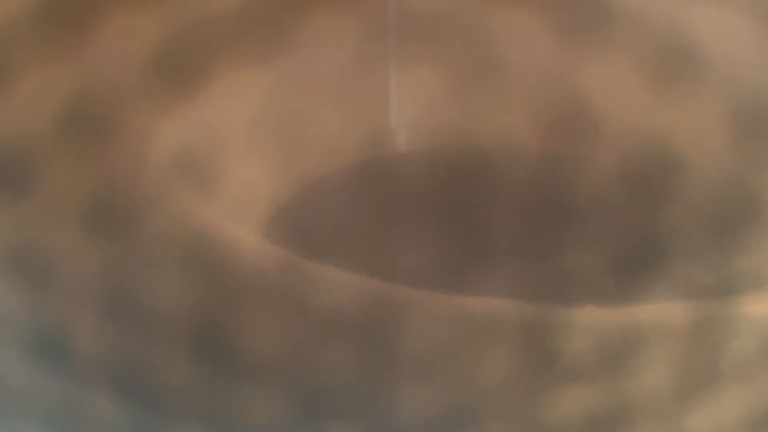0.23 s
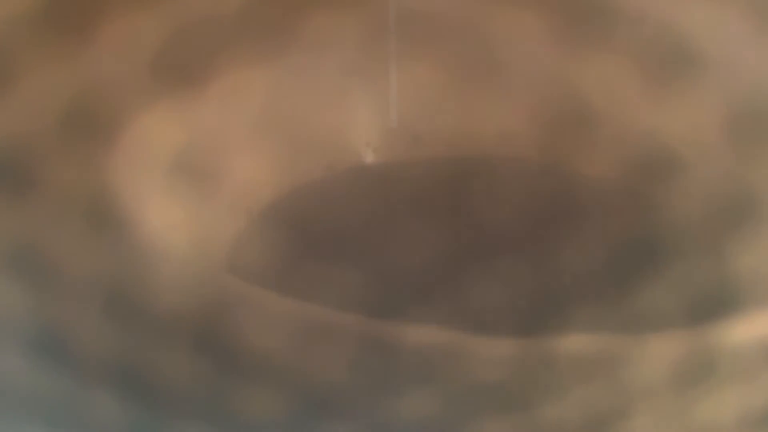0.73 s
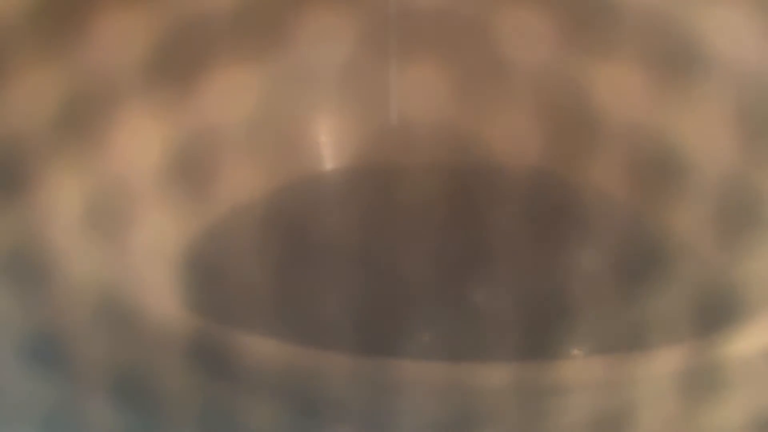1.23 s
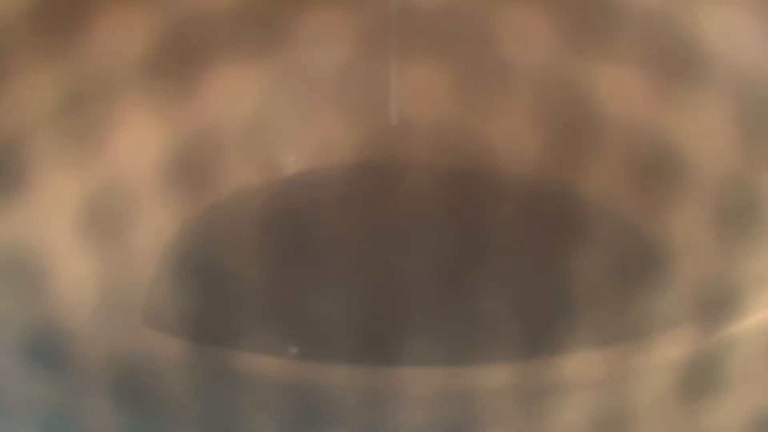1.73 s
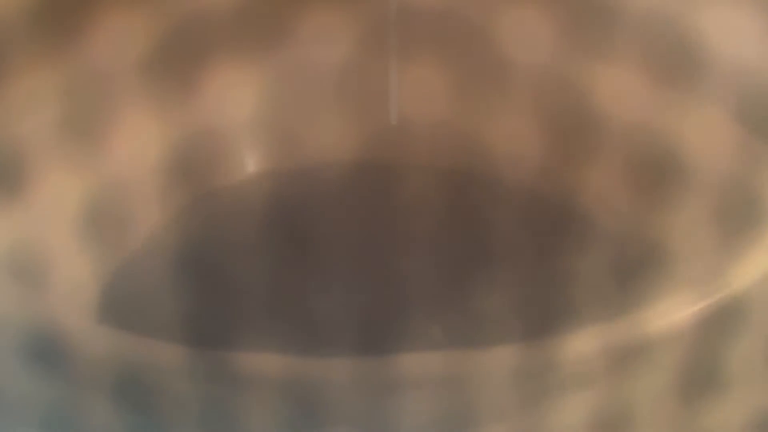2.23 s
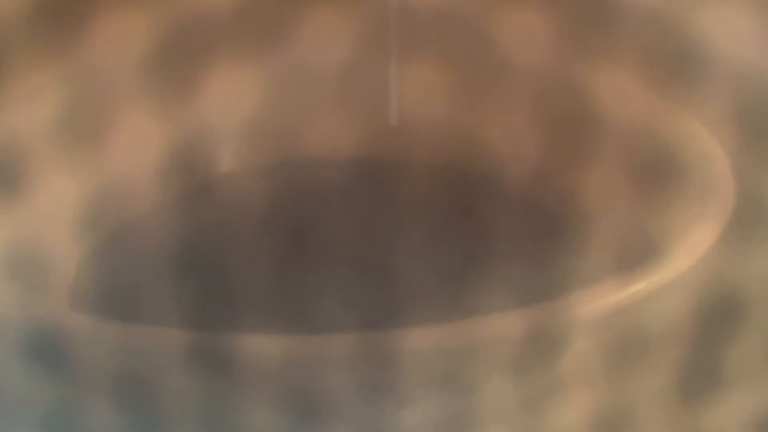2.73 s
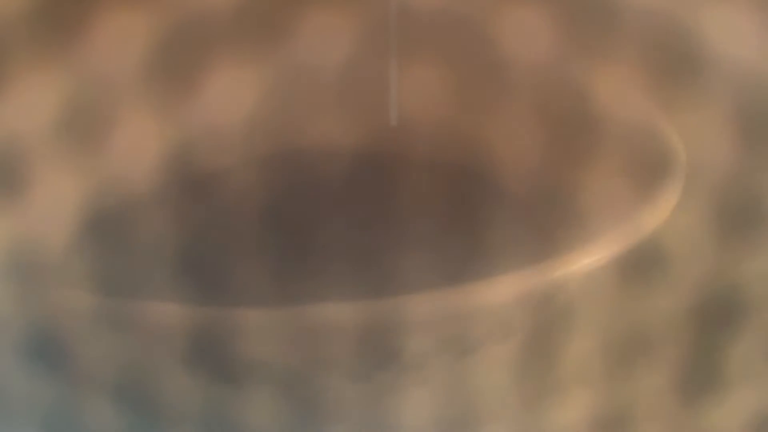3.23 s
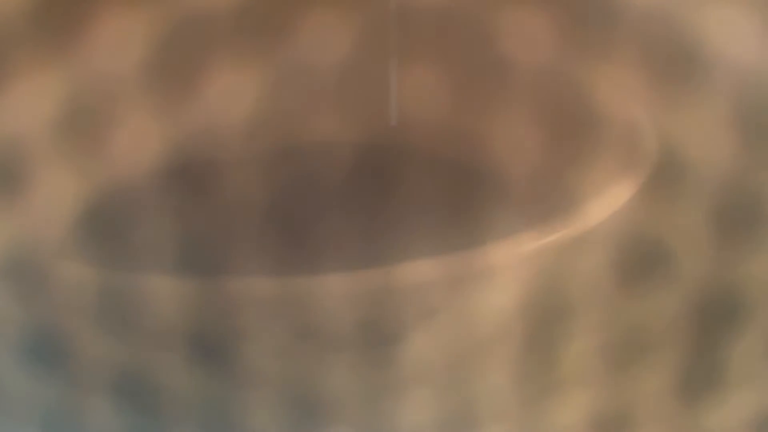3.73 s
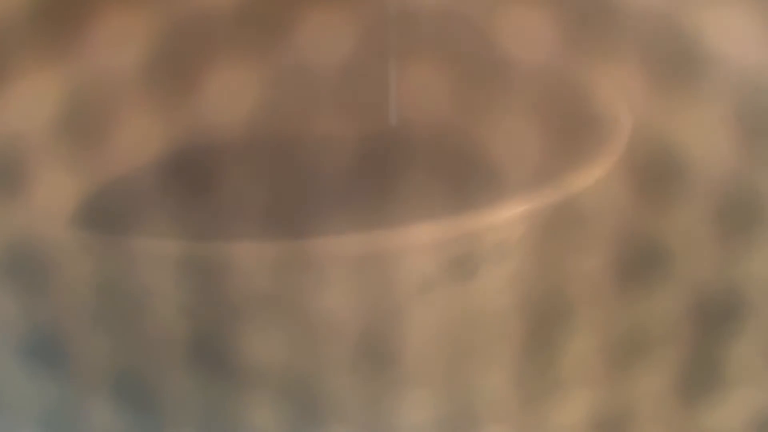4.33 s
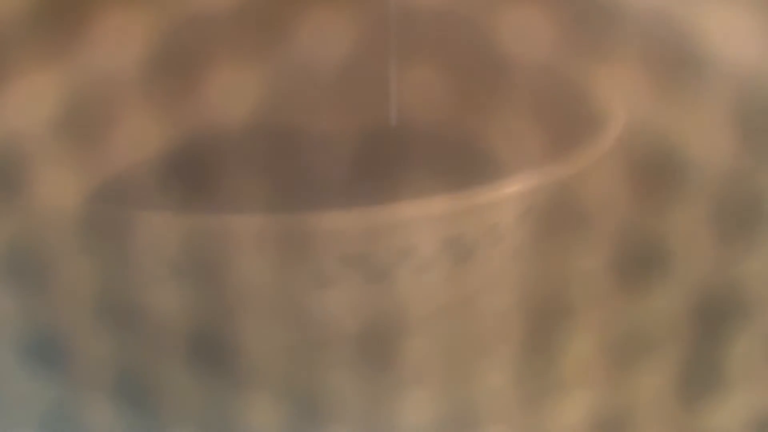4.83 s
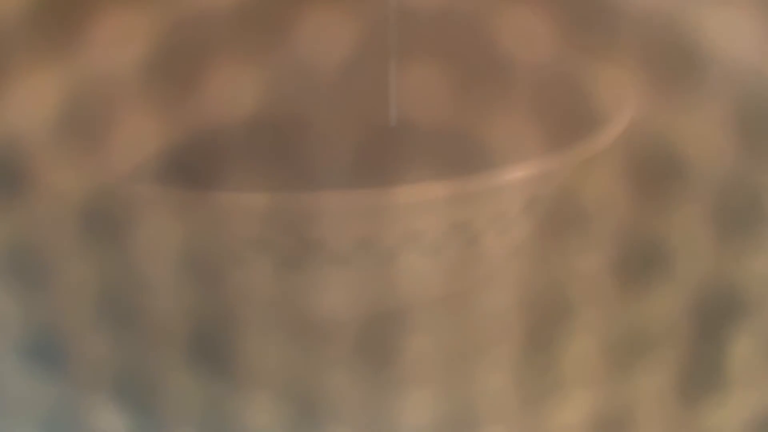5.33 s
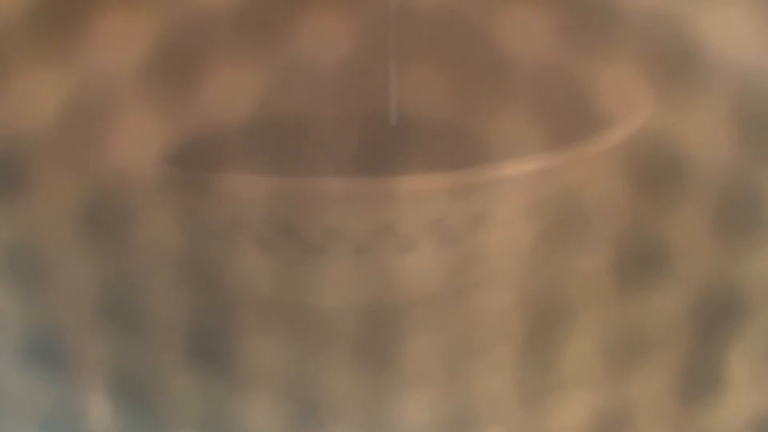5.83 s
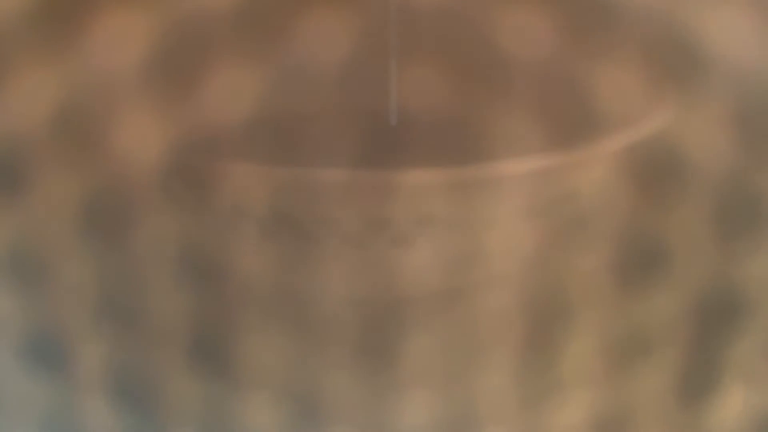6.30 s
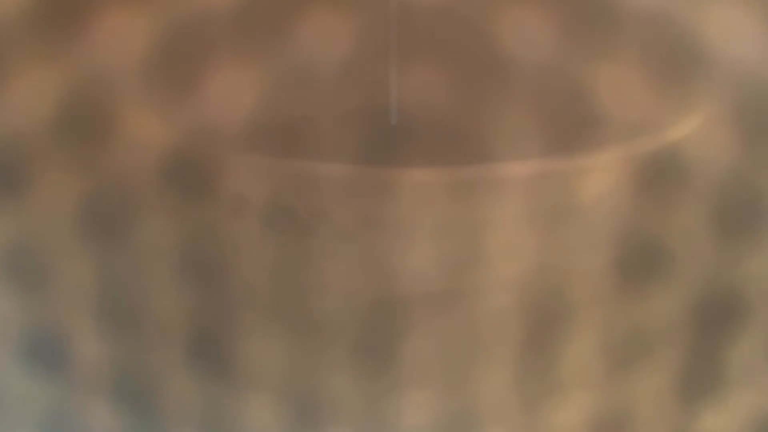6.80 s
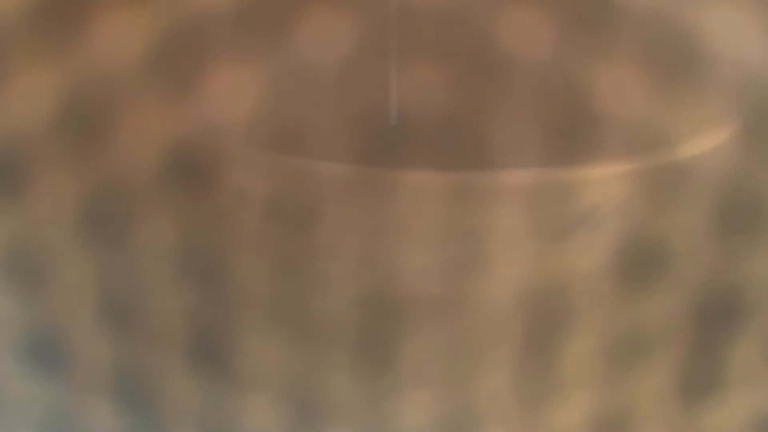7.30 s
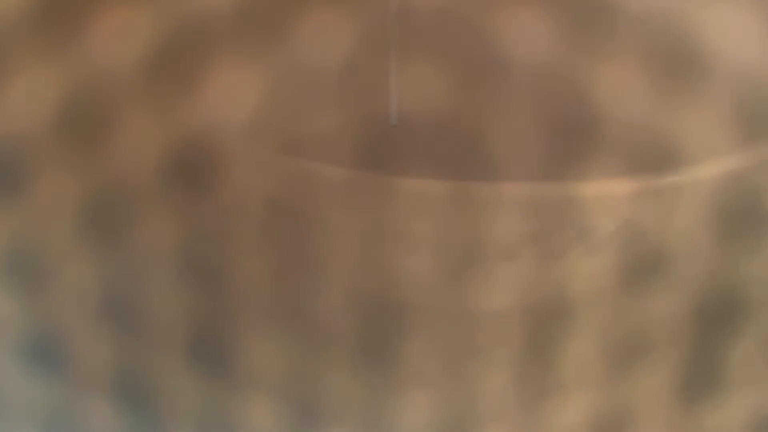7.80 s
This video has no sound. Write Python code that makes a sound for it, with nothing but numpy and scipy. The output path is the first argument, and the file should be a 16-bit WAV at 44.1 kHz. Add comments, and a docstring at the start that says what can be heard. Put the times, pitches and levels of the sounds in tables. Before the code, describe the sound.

For about 8 seconds a microwave oven runs without starting or stopping, heard close at its door in stereo. A loud, steady 120 Hz mains hum with a weaker 240 Hz overtone leads, joined by a fan drone near 151 Hz that sags very slightly in the last seconds. They beat about 31 times a second, a fast flutter shaking a loose panel in a dull rattle around 500 Hz. Above lie a fine sheet-metal buzz and an even gear whir, rasping about 15 times a second and strongest near 1 s. Mostly low and mid air rush carries faint wavering whistles, with brief grainy surges near 0.5, 1.4, 3.9, 4.4, 5.9 and 6.6 s. Very faint sizzles come around 1.8-2.2 and 6.4-7.1 s; two tiny bright ticks at 3.9 and 4.1 s. Overtones swell and fade slowly as the cup circles; the drone stays constant.

```python
"""Microwave oven running

A microwave oven is heard at its door while a cup turns inside. Mains harmonics make the hum, a comb of
fine lines the buzz; the fan's blade tone beats against the hum in a fast throb that shakes a loose panel.
Gears whir as noise rasped in step with the mains. Filtered noise makes the rush of air, with short grainy
surges in its mid band, and wavering whistles; short bursts of it make faint sizzles and ticks inside."""
import sys
import numpy as np
from scipy import signal
from scipy.fft import rfft, irfft
from scipy.io import wavfile

SR = 44100
rng = np.random.default_rng(int(sys.argv[2]) if len(sys.argv) > 2 else 0)


def wav_record(signal):
    """Record a signal, one row per channel, as 16-bit PCM in the file named by sys.argv[1]."""
    frames = np.transpose(np.atleast_2d(signal))
    bounded = np.clip(frames, -1, 1)
    # unit amplitude maps onto the largest positive 16-bit level
    quanta = np.round(bounded * 32767).astype(np.int16)
    wavfile.write(sys.argv[1], SR, quanta)


N = 355225
TIME = np.arange(N) / SR  # s
BINS = np.fft.rfftfreq(N, 1 / SR)  # Hz
MAINS_HZ = 60.0126
TURN_S = 10.6  # one round of the turntable

# harmonics of transformer and casing, before the slow swells:
# mains_multiple, level_db, left_over_right_db, left_lead_rad
HUM_HARMONICS = [(1, -37.2, -1.0, 0.12), (2, -19.5, 0.5, 0.45), (3, -40.4, -0.7, 0.0), (4, -31.9, 4.7, 0.3),
                 (5, -58.0, 2.0, 0.4), (6, -47.3, 3.8, 0.7), (7, -54.5, 2.4, 0.8), (8, -52.5, 9.2, -1.7),
                 (9, -50.0, 6.7, -1.2), (10, -53.7, 1.2, 0.0), (12, -65.4, -0.1, -0.8),
                 (14, -63.0, 10.0, -1.5), (16, -62.0, 1.3, 1.1), (18, -67.0, 1.5, -0.4),
                 (22, -67.4, -3.5, -0.3), (24, -66.2, 0.3, 1.0), (26, -61.2, -0.2, -0.1),
                 (27, -70.0, -2.1, -0.1), (28, -71.5, 0, 0), (29, -70.0, 0, 0), (31, -71.0, 0, 0),
                 (32, -65.8, 1.1, -0.6), (36, -65.7, 1.2, 0.0), (38, -68.8, 1.6, 0.2),
                 (39, -69.8, 2.5, 0.0), (44, -69.8, 2.3, 0.3), (48, -72.2, 8.7, 0.6), (54, -71.7, 8.3, 1.3),
                 (64, -73.5, 3, 0.5)]


def gain_of(db):
    """Level law: decibels to an amplitude factor."""
    return 10 ** (np.asarray(db) / 20)


def evened(x):
    """Normalisation: scales to rms 1."""
    return x / np.sqrt(np.mean(x ** 2) + 1e-30)


def read(rows, hz):
    """Interpolation on a logarithmic frequency axis: each column of a spectrum table at hz."""
    f, *columns = np.transpose(rows)
    return [np.interp(np.log(hz + 1), np.log(f + 1), c) for c in columns]


def follow(rows):
    """Linear interpolation in time: each column of a curve table at every sample."""
    s, *columns = np.transpose(rows)
    return [np.interp(TIME, s, c) for c in columns]


def white():
    """White noise: the spectrum of independent samples of variance 1."""
    return rfft(rng.standard_normal(N))


def bell(hz, width_hz, bins=BINS):
    """Gaussian band: a peak of height 1, about width_hz wide at half its height."""
    return np.exp(-((bins - hz) / (0.61 * width_hz)) ** 2)


def drift(rate_hz):
    """Low-passed noise: a random fluctuation of rms 1, mostly slower than rate_hz."""
    return evened(irfft(white() * bell(0, 2 * rate_hz), N))


def swell(depth_db, peak_s, order=1):
    """Periodic modulation: a level in dB that peaks at peak_s, `order` times in each turntable round."""
    return depth_db * np.cos(2 * np.pi * order * (TIME - peak_s) / TURN_S)


def load_db(of_shaft, of_mains):
    """Varying load: the circling cup makes one tone swell and fade over each turntable round."""
    # shaft_multiple, mains_multiple, depth_db, peak_s, swells_per_round
    tone_swells = [(0, 3, 1.7, 6.5, 1), (0, 4, 1.4, 7.8, 1), (0, 5, 6.0, 8.5, 1), (0, 5, 4.0, 7.8, 2),
                   (0, 6, 2.8, 9.0, 1), (0, 6, 2.6, 6.7, 2), (0, 8, 4.0, 10.0, 1), (0, 8, 2.0, 7.0, 2),
                   (0, 9, 1.8, 8.5, 1), (0, 10, 1.6, 1.6, 1), (0, 10, 1.4, 3.5, 2), (0, 16, 2.5, 2.0, 1),
                   (0, 18, 4.0, 7.2, 3), (0, 18, 3.0, 7.6, 1), (0, 26, 3.0, 10.0, 1), (4, 0, 0.35, 1.7, 3),
                   (4, 2, 1.8, 2.6, 1), (4, 4, 9.0, 2.3, 1), (4, 4, 2.5, 4.0, 2), (4, 6, 4.0, 8.6, 1),
                   (4, 6, 2.2, 7.0, 2), (8, 0, 1.8, 8.6, 1), (8, 0, 2.0, 6.0, 2), (8, 0, 1.3, 5.0, 3),
                   (14, 2, 2.0, 5.6, 1)]
    return sum(swell(depth, peak_s, order) for k, m, depth, peak_s, order in tone_swells
               if (k, m) == (of_shaft, of_mains))


def partial(turns, db, pan_db, lead, scatter_hz=520, waver_db=1.2, waver_hz=550, count=24):
    """Phase and level differences of one tone at two microphones; high tones scatter and waver more."""
    hz = turns[-1] / TIME[-1]
    # the panels scatter the phases of the higher tones
    angle = 2 * np.pi * turns + rng.standard_normal() * (hz / scatter_hz) ** 2
    wander = np.interp(TIME, np.linspace(0, TIME[-1], count), rng.standard_normal(count))
    wander_db = waver_db * hz ** 2 / (hz ** 2 + waver_hz ** 2) * wander
    level = gain_of(db + wander_db)
    pair = [level * gain_of(side * pan_db / 2) * np.sin(angle + side * lead / 2) for side in (1, -1)]
    # sine rms is the level when centred; a wide pan is turned down
    return np.array(pair) * np.sqrt(2 / np.cosh(pan_db * np.log(10) / 10))


def at_ports(first, second):
    """Partial coherence: two unrelated spectra become a partly alike pair of channels."""
    # the air at the two microphones: pitch_hz, likeness (0-1), left_lead_rad, left_over_right_db
    coherence = [(35, 0.99, -1.2, -2), (70, 1, 0, 2.5), (150, 0.4, 0.74, 2.5), (280, 0.8, -0.65, 1),
                 (405, 1, 1, 1), (500, 0.3, 0.77, 1), (600, 0.9, 0.5, 1.5), (662, 0.3, 0, 2),
                 (732, 0.5, -3.5, -0.5), (830, 0.4, 0.3, 0.5), (1190, 0.8, 0.9, 2.5),
                 (1850, 0.8, 0.5, -1.5), (2440, .88, -0.03, 4), (3080, 0.8, 1.36, 3.5), (4550, 0.96, 0, 5),
                 (7040, 1, 2.5, 0.5), (8500, 1, 4.5, -0.9)]
    same, lead, pan_db = read(coherence, BINS)
    same = np.clip(same, -1, 1)
    right = (same * first + np.sqrt(1 - same ** 2) * second) * np.exp(-1j * lead)
    return irfft(np.array([first * gain_of(pan_db / 2), right * gain_of(-pan_db / 2)]), N)


def add(mix, s, sound):
    """Superposition: mixes a sound in at time s."""
    part = mix[round(s * SR):][:len(sound)]
    part += sound[:len(part)]


def snippet(hz, width_hz, size=8192):
    """Band-passed noise: a short stretch of rms 1, with its time axis."""
    band = bell(hz, width_hz, np.fft.rfftfreq(size, 1 / SR))
    return np.arange(size) / SR, evened(irfft(rfft(rng.standard_normal(size)) * band))


def spurt(length, db, hz, width_hz, grain, edge_s, grain_hz=450):
    """Amplitude modulation by slower noise: a grainy burst that rises and falls quickly."""
    t, noise = snippet(hz, width_hz)
    grains = np.exp(grain * snippet(0, grain_hz)[1])
    edges = np.sin(np.pi / 2 * np.clip(np.minimum(t, length - t) / edge_s, 0, 1)) ** 2
    return gain_of(db) * edges * evened(noise * grains)


def transformer(mains, hum_db=0.11):
    """Magnetostriction: the core flexes twice a mains cycle; some harmonics swell as the cup circles."""
    return sum(partial(m * mains, hum_db + db + load_db(0, m), pan, lead)
               for m, db, pan, lead in HUM_HARMONICS)


def buzz(mains, odd_db=-6, uneven_db=3.0, flutter=0.16):
    """Periodic chatter has a line spectrum: sheet metal repeats each mains cycle, even lines stronger."""
    # upper mains harmonics, before the odd-line cut and the unevenness: pitch_hz, level_db
    comb = [(660, -74), (1500, -77), (2600, -76), (3200, -77.5), (4200, -84), (5000, -88), (6300, -89),
            (7500, -108), (9500, -100), (11300, -104), (12000, -92), (12400, -112)]
    size = 4096  # samples in one stored cycle
    k = np.arange(size // 2 + 1)
    hz = k * MAINS_HZ
    in_band = (hz > comb[0][0] - MAINS_HZ) & (hz < comb[-1][0])
    free = in_band & ~np.isin(k, np.transpose(HUM_HARMONICS)[0])  # lines the hum does not hold
    line_db = read(comb, hz)[0] + odd_db * (k % 2) + uneven_db * rng.standard_normal(len(k))
    level = free * gain_of(line_db)
    # phases partly shared by the two channels
    angle = 2 * np.pi * rng.random(len(k)) + .5 * rng.standard_normal((2, len(k)))
    cycles = irfft(level * np.exp(1j * angle)) * size / np.sqrt(2)
    pair = np.array([np.interp(mains % 1, np.arange(size) / size, c) for c in cycles])
    return pair * gain_of([[1.2], [-1.2]]) * (1 + flutter * drift(9.5))


def fan(mains, shaft, fan_db=0.3, waver=0.015):
    """Blade passing: four blades give the main tone; pulsing motor torque adds mains sidebands."""
    # tones before fan_db and swells:
    # shaft_multiple, plus_mains_multiple, level_db, left_over_right_db, left_lead_rad
    shaft_orders = [(3, 0, -45.4, 0, 0.5), (4, 0, -22.3, 2, 0.2), (5, 0, -50.4, 5, 1.1),
                    (6, 0, -52.0, -8, 2.1), (8, 0, -46.1, 3, 0.0), (12, 0, -53.1, -3, -0.4),
                    (2, 1, -44.8, 12, 0.4), (6, -1, -48.0, 2, 0.5), (4, 1, -53.3, 3, 0.8),
                    (-4, 4, -50.7, -2, 0.5), (1, 2, -47.9, 6, -0.4), (3, 2, -48.7, -3, 1.1),
                    (4, 2, -43.8, 3, 0.3), (8, -2, -51.9, 2, -0.3), (8, 2, -55.4, 3, 0.7),
                    (1, 4, -51.2, 2, 0.3), (2, 4, -54.3, -2, 0.3), (4, 4, -57.3, 2, 0.4),
                    (4, 6, -60.0, -2, 0.1), (5, 2, -56.5, 2, 0.3), (3, 4, -61.0, 2, 0.3),
                    (8, 1, -60.0, 2, 0.3), (14, 2, -56.0, 0, 1.7)]
    tones = sum(partial(k * shaft + m * mains, db + load_db(k, m), pan, lead)
                for k, m, db, pan, lead in shaft_orders)
    return gain_of(fan_db) * tones * (1 + waver * drift(2.2))


def rattle(mains, shaft, rattle_db=-51, ring_hz=490, width_hz=300, wobble=.5,
           chafe_db=-58, chafe_hz=1100, chafe_width_hz=950, early=0.085):
    """Beating: a loose panel chatters when blade tone and hum push together; its edge chafes slower."""
    throb = (1 + np.cos(2 * np.pi * (4 * shaft - 2 * mains))) ** 2
    # the third shaft order beats slowly with the hum; early is in beat cycles
    beat = (1 + np.cos(2 * np.pi * (2 * mains - 3 * shaft + early))) ** 2
    once_a_turn = 1 - wobble * np.cos(2 * np.pi * shaft)
    chatter_db = rattle_db + swell(depth_db=1.8, peak_s=5.1, order=2)
    chatter = gain_of(chatter_db) * evened(throb * once_a_turn)
    chafe = gain_of(chafe_db) * evened(beat)
    ring, edge = evened(bell(ring_hz, width_hz)), evened(bell(chafe_hz, chafe_width_hz))
    return at_ports(*[rfft(chatter * noise) * ring + rfft(chafe * noise) * edge
                      for noise in rng.standard_normal((2, N))])


def turntable(mains, whir_db=-55.0, first_s=0.021, rise_s=0.004, decay_s=0.01, uneven=0.14, fresh=0.98):
    """Synchronous gearing: a rasp every four mains cycles, harder on one side of each round."""
    # resonances of the gearbox: pitch_hz, width_hz, relative_level_db
    gear_modes = [(890, 230, -0.5), (1350, 300, -12), (1600, 95, -7)]
    since = ((mains - first_s * MAINS_HZ) % 4) / MAINS_HZ  # s since the last stroke
    strain_db = swell(depth_db=3.2, peak_s=1.1) + swell(depth_db=1.5, peak_s=1.2, order=2)
    envelope = (1 - np.exp(-since / rise_s)) * np.exp(-since / decay_s)
    strokes = envelope * (1 + uneven * drift(14.0)) * gain_of(strain_db)
    # the same teeth meet on every turn, so part of the rasp repeats
    teeth = rng.standard_normal((2, SR))[:, np.round(since * SR).astype(int)]
    ring = sum(gain_of(db) * bell(hz, width) for hz, width, db in gear_modes)
    rasps = rfft(strokes * (teeth + fresh * rng.standard_normal((2, N)))) * ring
    return gain_of(whir_db) * evened(at_ports(*rasps))


def sizzles():
    """Random modulation of band noise: short, grainy spurts of high hiss."""
    # start_s, length_s, level_db, centre_hz, width_hz
    spurts = [(1.793, .12, -67, 4300, 2800), (2.13, 0.084, -72, 5800, 1600),
              (2.132, .09, -77.5, 10300, 3000), (6.395, .06, -78, 11400, 1500),
              (6.925, .14, -74.5, 10550, 3000), (6.96, .14, -70, 5000, 2000)]
    out = np.zeros(N)
    for s, length, db, hz, width_hz in spurts:
        add(out, s, spurt(length, db, hz, width_hz, grain=.5, edge_s=.022))
    return out


def ticks(decay_s=.0014):
    """Exponential decay: tiny bright snaps of band noise from inside die within a few milliseconds."""
    # start_s, ring_hz, width_hz, level_db (before the decay)
    snaps = [(3.917, 11000, 4000, -58), (4.097, 12000, 9000, -58.5)]
    out = np.zeros(N)
    for s, hz, width_hz, db in snaps:
        t, ring = snippet(hz, width_hz)
        add(out, s, gain_of(db) * ring * np.exp(-t / decay_s))
    return out


def whistles():
    """Narrow-band noise wavers like a tone: the vents sing, most of them swelling as the cup circles."""
    # whistles in the vents, before the swells: pitch_hz, width_hz, level_db, left_lead_rad
    vent_tones = [(216.3, 2.2, -48.5, 0.68), (422, 6, -57, 0.1), (432.5, 4, -55.5, 0.1),
                  (454.5, 7, -54.5, -0.4), (648.5, 7, -54.5, 1.7), (1082, 8, -64.5, 0.53),
                  (1575, 70, -68, 0)]
    out = np.zeros((2, N))
    middle = swell(depth_db=4.0, peak_s=4.6)
    swells = [0, middle, middle, 0, swell(depth_db=2.5, peak_s=3.7),
              swell(depth_db=3.0, peak_s=6.9, order=2), swell(depth_db=1.5, peak_s=0.7)]
    for (hz, width, db, lead), swell_db in zip(vent_tones, swells):
        tone = white() * bell(hz, width)
        pair = irfft(np.array([tone, tone * np.exp(-1j * lead)]), N)
        out += gain_of(db + swell_db) * evened(pair)
    return out


def surges():
    """Amplitude modulation: short grainy surges of mid-band noise, stronger moments of the rush."""
    # start_s, length_s, level_db
    mid_surges = [(0.545, .03, -52), (1.418, 0.034, -54), (3.874, .025, -55), (4.352, 0.033, -53),
                  (4.519, .045, -55), (5.865, 0.032, -53), (6.605, 0.035, -49)]
    out = np.zeros(N)
    for s, length, db in mid_surges:
        add(out, s, spurt(length, db, hz=1300, width_hz=1000, grain=.25, edge_s=.008))
    return out


def air(mains, air_db=-1.39, pulsing=.1, overtone=.6, pulsing_hz=1500, gusts_db=0.4):
    """Filtered noise: a rush coloured by the casing; its hiss swells, gusts and pulses with the core."""
    # noise floor of the rush, before air_db and the casing modes: pitch_hz, level_db_per_hz
    noise_floor = [(20, -82.5), (33, -81), (40, -66), (100, -59), (140, -52.5), (200, -61), (500, -70),
                   (1000, -78), (2000, -82.5), (2700, -82.5), (3100, -88), (4400, -96.5), (6000, -101.3),
                   (6600, -105), (7500, -115), (9600, -105), (12200, -112), (13200, -135)]
    # resonances and notches of the casing: pitch_hz, width_hz, lift_db
    casing_modes = [(582, 13, -6), (604, 70, 7), (875, 240, 4), (1017, 29, -8), (1165, 55, 3.5),
                    (1270, 55, -3), (1573, 90, 3), (1750, 100, -3.5), (1970, 330, 3), (2490, 400, 1.5),
                    (3860, 340, 2.5), (6100, 50, 6), (6430, 51, 7)]
    casing_db = sum(lift * bell(hz, width) for hz, width, lift in casing_modes)
    db = air_db + read(noise_floor, BINS)[0] + casing_db
    colour = gain_of(db) * np.sqrt(SR / 2)  # density per Hz to the scale of white noise
    first, second = white() * colour, white() * colour
    high = BINS ** 2 / (BINS ** 2 + pulsing_hz ** 2)  # the share that counts as hiss
    round_db = swell(depth_db=0.44, peak_s=1.6) + swell(depth_db=0.3, peak_s=2.2, order=2)
    draught_db = round_db + gusts_db * drift(3.5)
    pulses = np.cos(4 * np.pi * mains) + overtone * np.cos(8 * np.pi * mains)  # twice, four times mains
    hiss = at_ports(first * high, second * high) * (1 + pulsing * pulses)
    rush = at_ports(first * (1 - high), second * (1 - high))
    return rush + hiss * gain_of(draught_db)


def scene():
    """Superposition of all sources; the mains and the fan shaft drive the tones, rattle and rasps."""
    # fan speed: time_s, turns_per_s
    fan_speed = [(0, 37.834), (1, 37.783), (2, 37.81), (3, 37.789), (4.2, 37.895), (5.5, 37.792),
                 (7, 37.646), (8.05, 37.537)]
    # both in cycles since the start; the shaft starts part of the way round
    mains = MAINS_HZ * TIME
    shaft = np.cumsum(follow(fan_speed)[0]) / SR + 5 / 8
    tones = transformer(mains) + buzz(mains) + fan(mains, shaft)
    machinery = rattle(mains, shaft) + turntable(mains)
    return tones + machinery + sizzles() + ticks() + whistles() + surges() + air(mains)


def record(dry):
    """Linear-phase low-pass filtering: the recorder's band limit."""
    edge_hz = 15700
    taps = signal.firwin(255, edge_hz, window=("kaiser", 9), fs=SR)
    half = len(taps) // 2
    padded = np.pad(dry, [(0, 0), (half, half)], "reflect", reflect_type="odd")
    return signal.oaconvolve(padded, taps[None], "valid")


dry = scene()
out = record(dry)
wav_record(out)
```